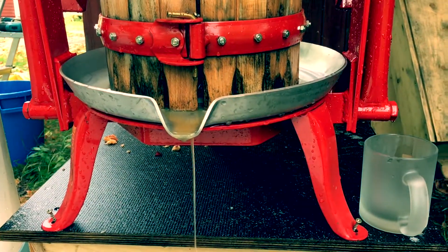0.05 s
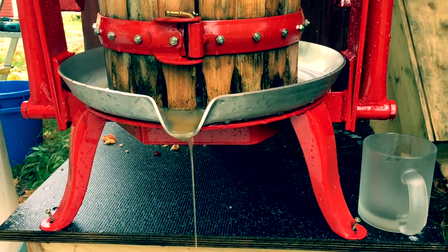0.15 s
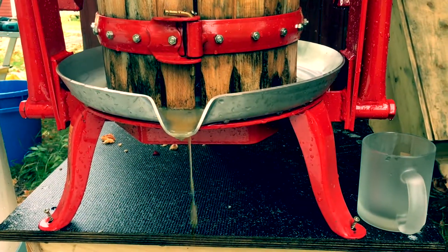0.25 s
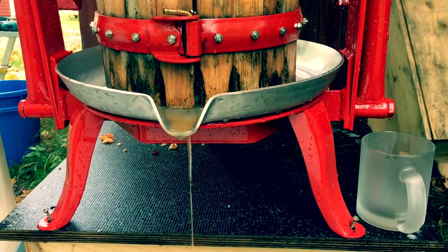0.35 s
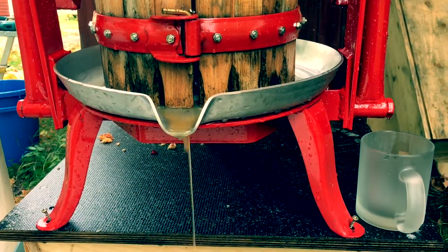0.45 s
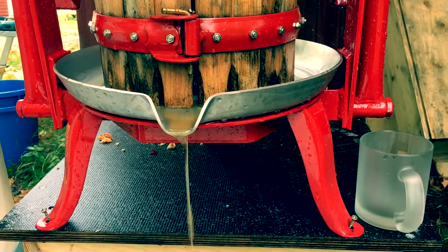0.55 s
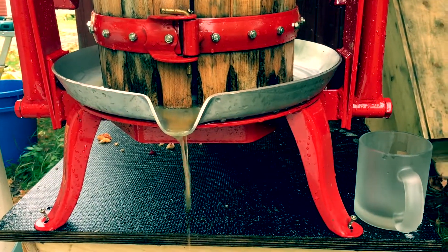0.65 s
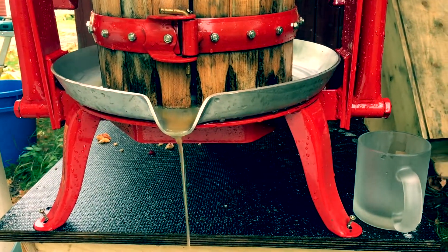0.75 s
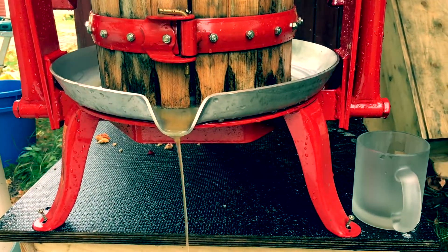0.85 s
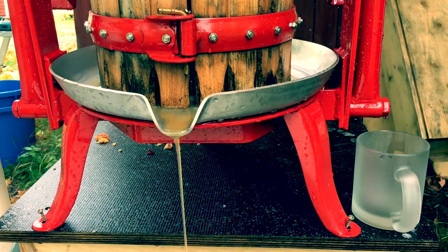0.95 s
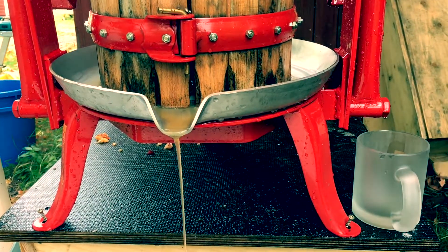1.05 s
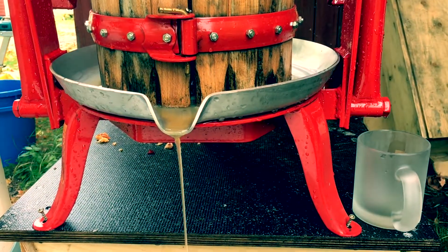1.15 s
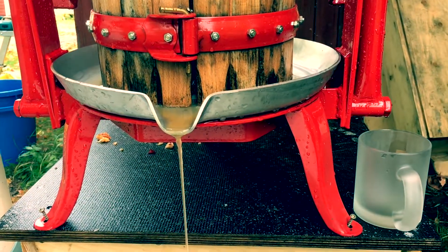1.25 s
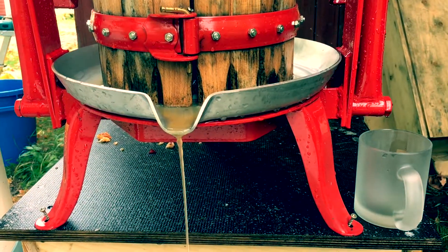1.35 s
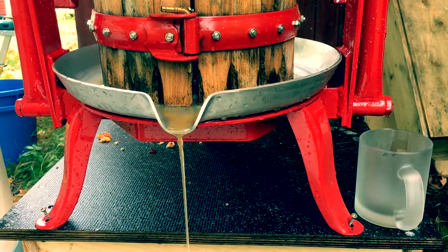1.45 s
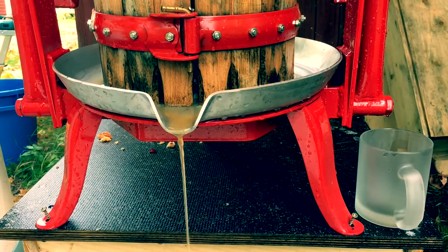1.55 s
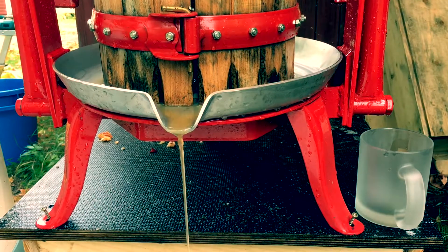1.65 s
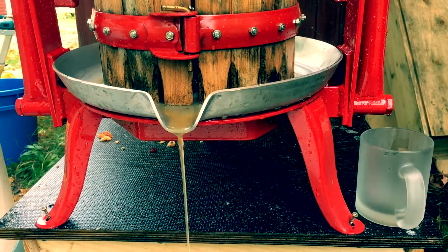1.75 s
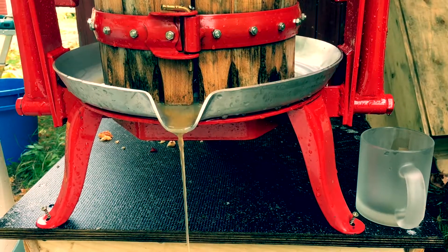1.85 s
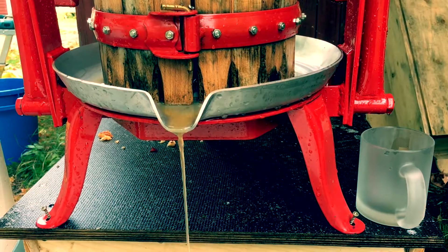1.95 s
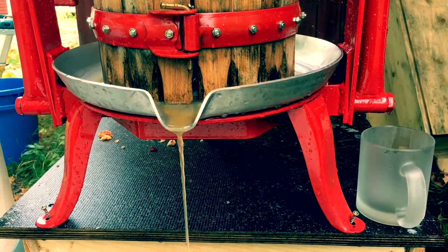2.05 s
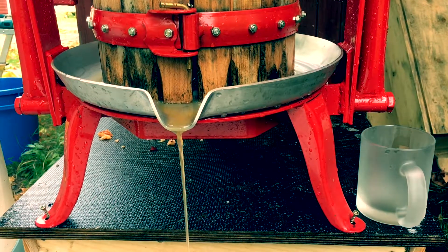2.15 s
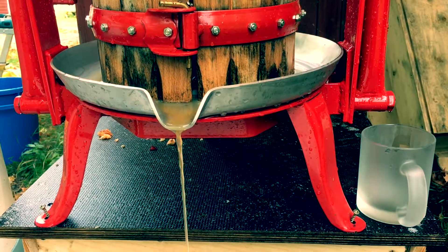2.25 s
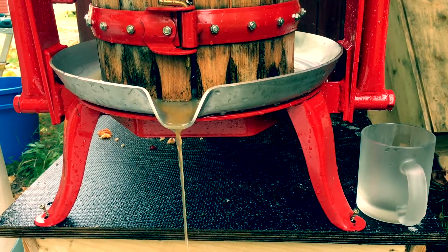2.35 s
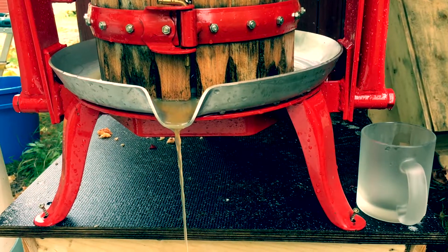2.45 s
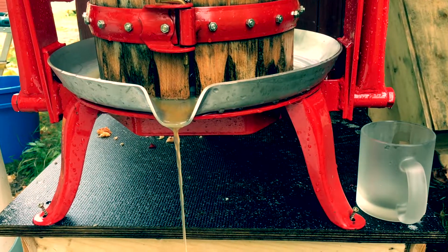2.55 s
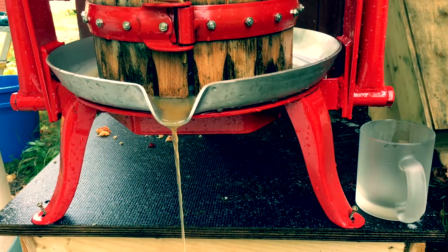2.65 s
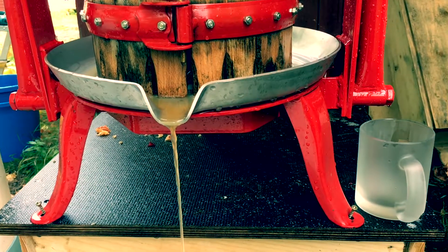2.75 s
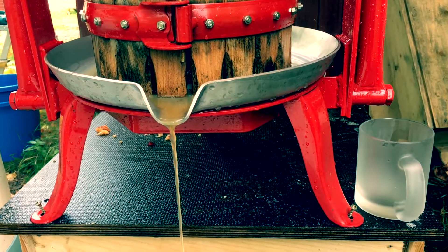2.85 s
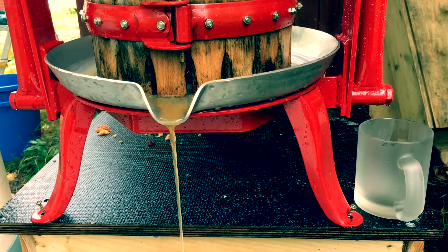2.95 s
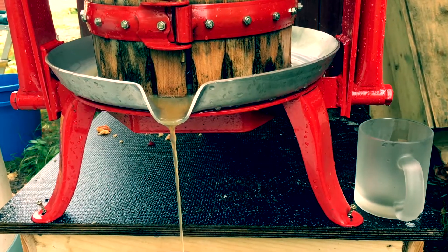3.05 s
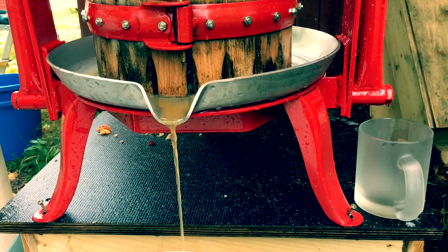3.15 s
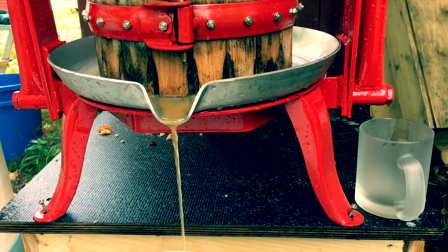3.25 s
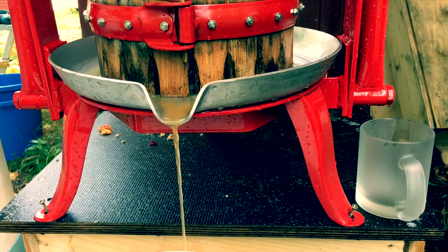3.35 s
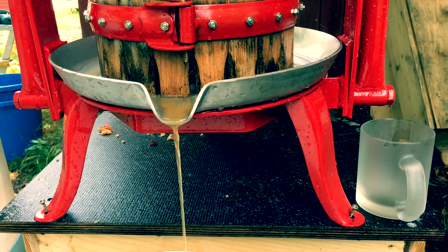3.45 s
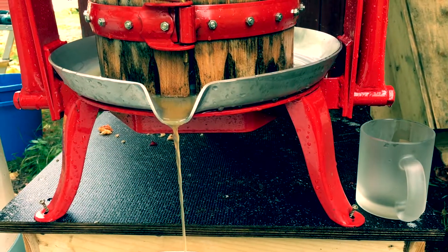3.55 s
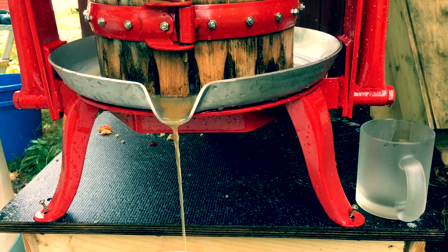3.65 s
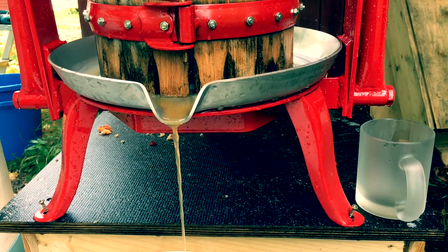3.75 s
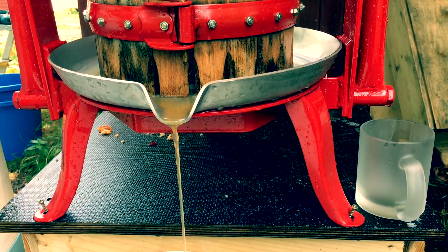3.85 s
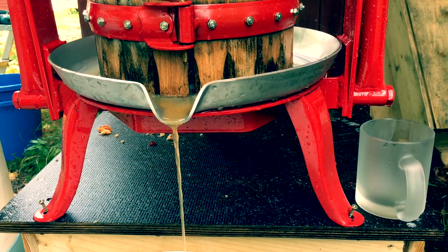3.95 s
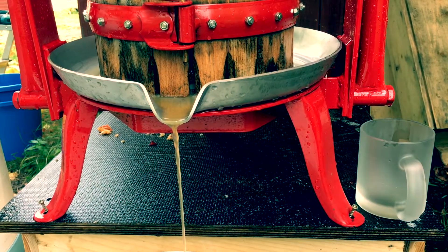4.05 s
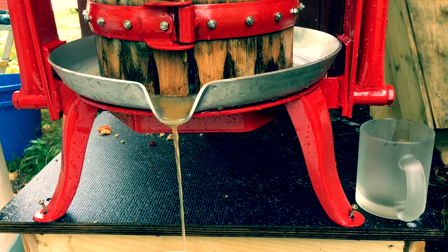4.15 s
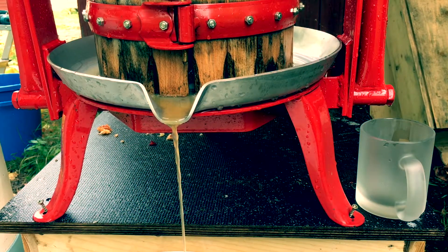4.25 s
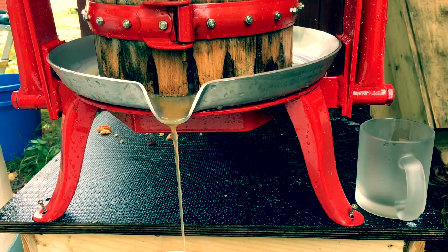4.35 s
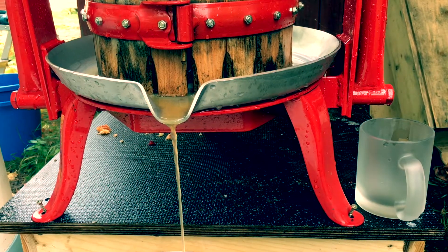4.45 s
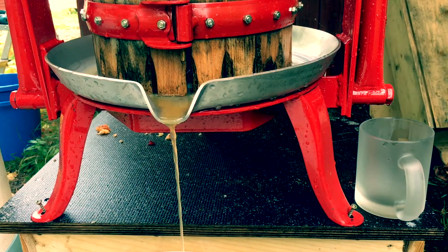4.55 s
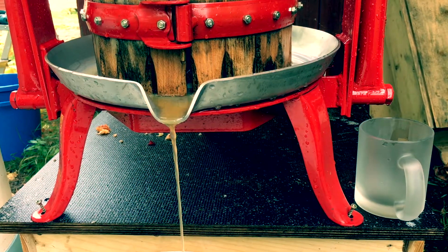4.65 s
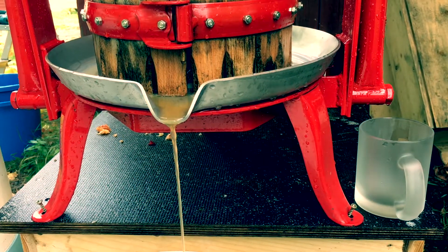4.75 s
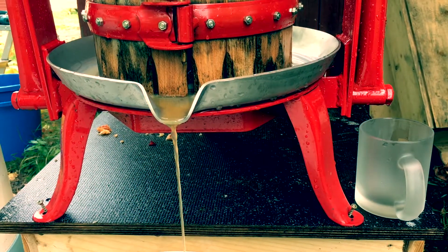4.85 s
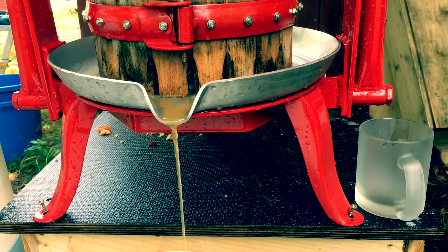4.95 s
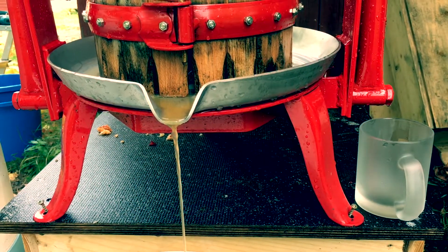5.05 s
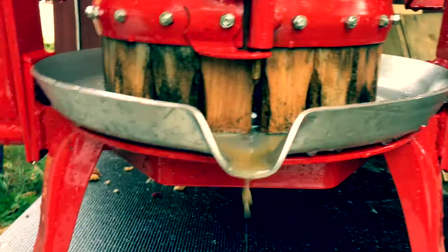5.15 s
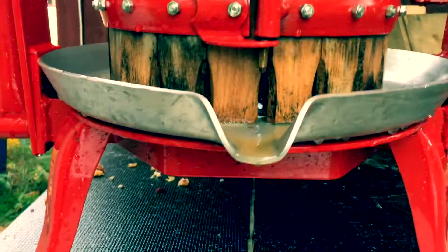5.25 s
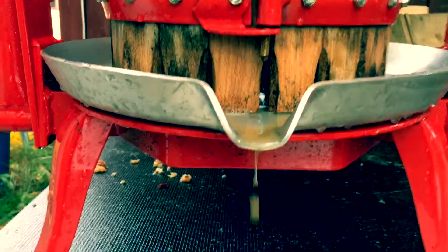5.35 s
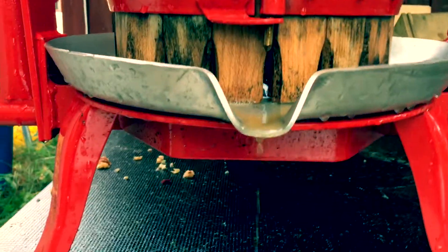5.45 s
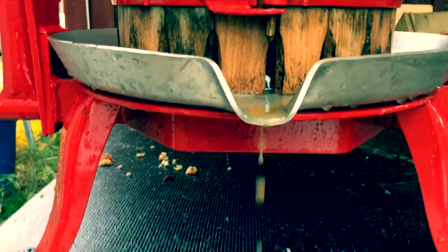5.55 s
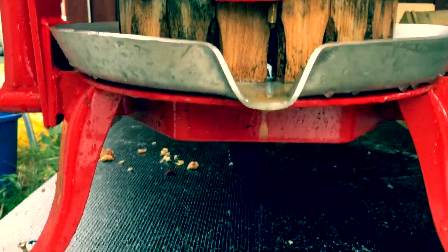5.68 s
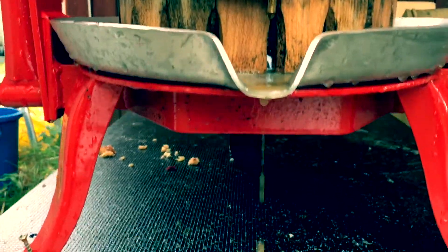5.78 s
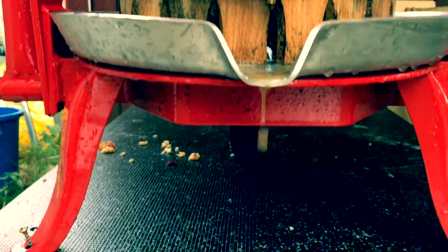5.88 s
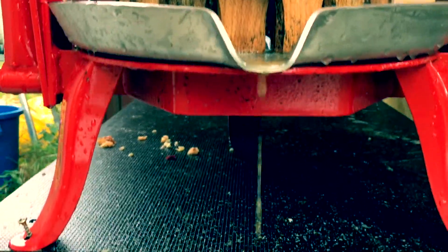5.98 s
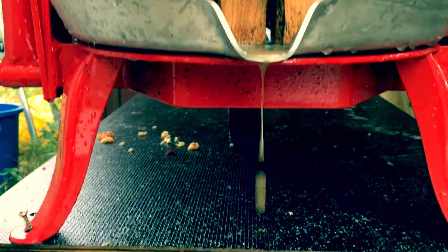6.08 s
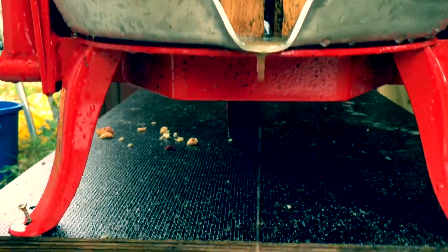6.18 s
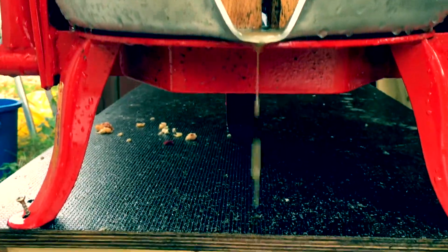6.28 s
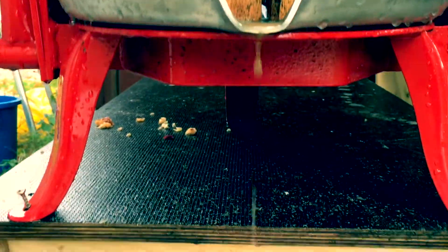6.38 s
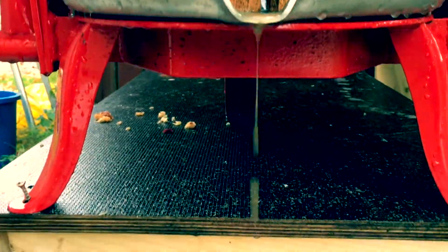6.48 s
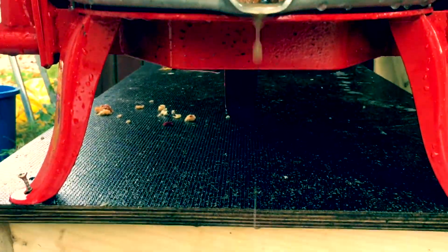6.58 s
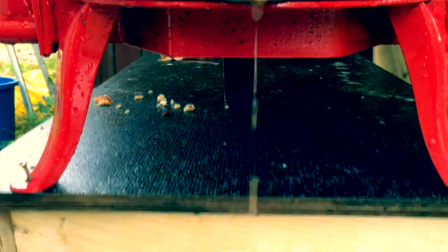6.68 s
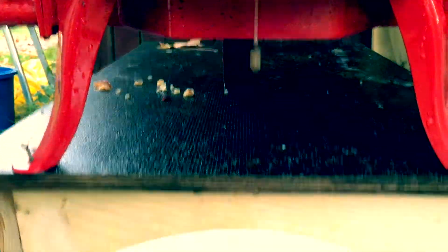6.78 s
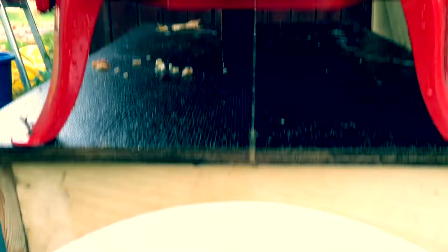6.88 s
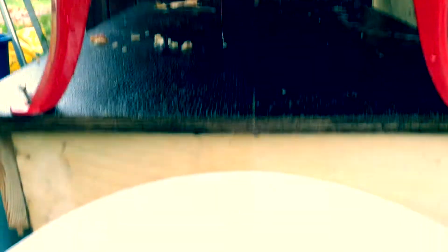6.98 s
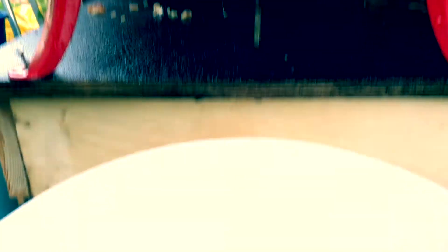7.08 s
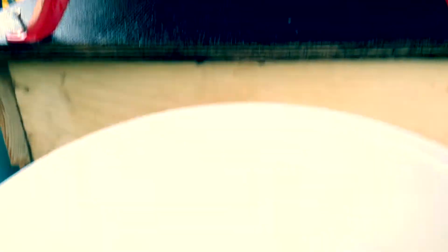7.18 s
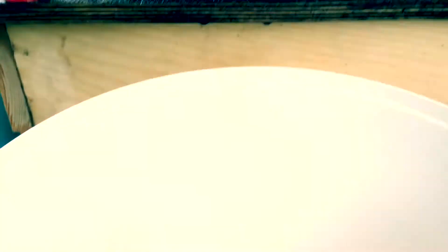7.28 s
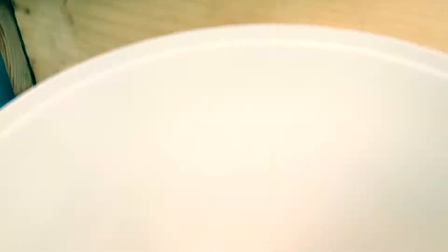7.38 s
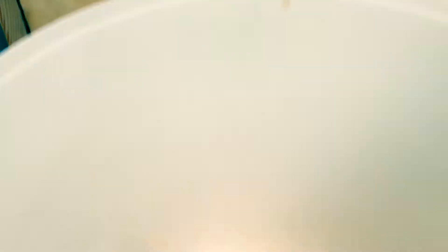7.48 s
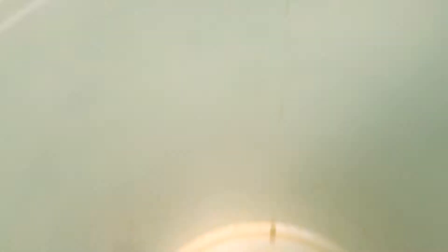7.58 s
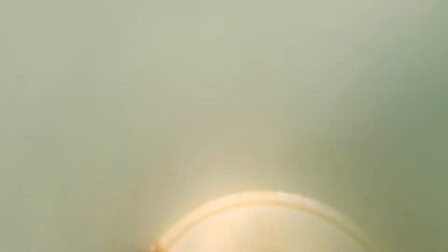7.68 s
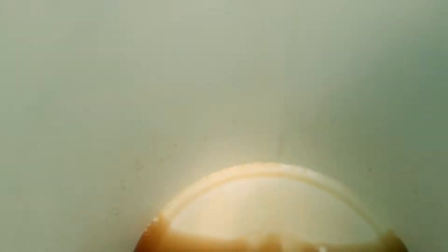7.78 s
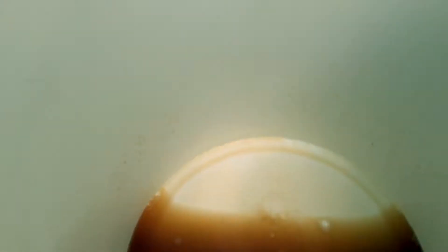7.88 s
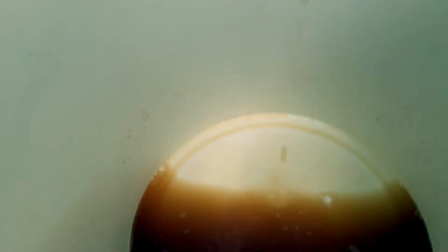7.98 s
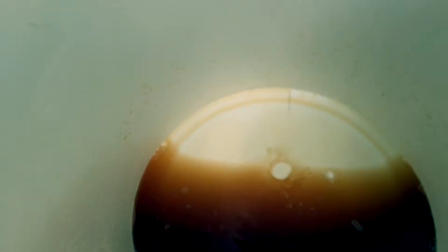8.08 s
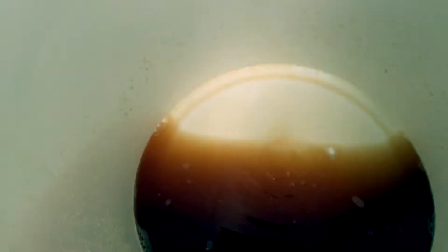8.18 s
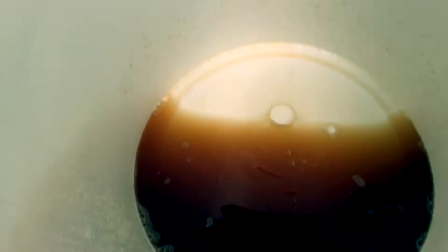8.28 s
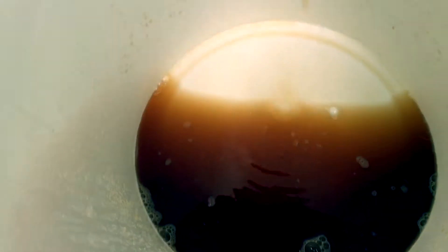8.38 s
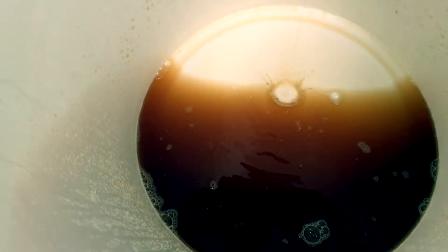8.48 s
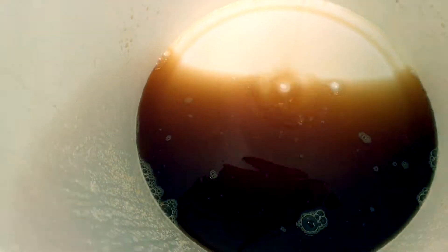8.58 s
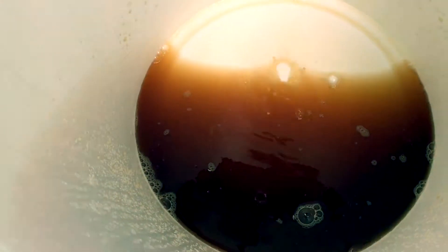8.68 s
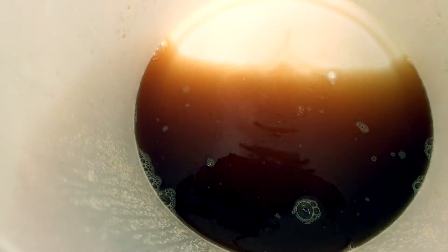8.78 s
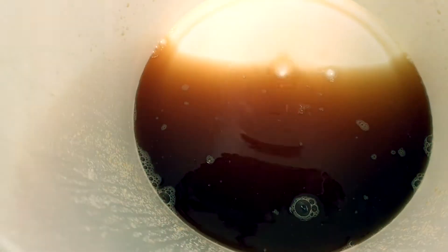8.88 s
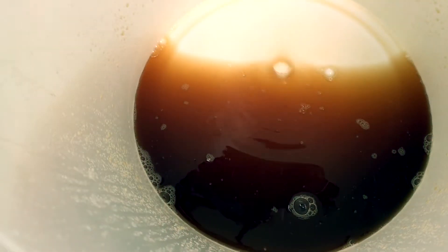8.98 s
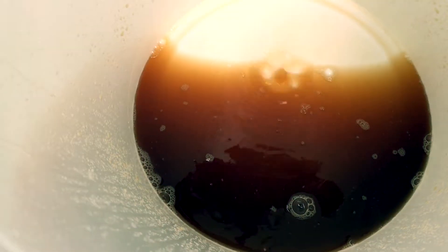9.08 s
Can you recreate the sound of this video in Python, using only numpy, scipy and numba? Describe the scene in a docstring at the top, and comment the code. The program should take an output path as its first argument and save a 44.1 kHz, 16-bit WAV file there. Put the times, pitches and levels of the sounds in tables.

```python
"""Juice runs from a fruit press into a plastic bucket as a thin stream: bubbles gurgle and spatter in a shallow
pool, the jet drums the bottom and the bucket air rings in its standing waves. The stream sound ends abruptly
and the level dips briefly, then single drops strike the bare bottom: decaying modes, down-sweeping slaps and
noisy splat. Smaller droplets, patter, ticks of spray and a few chirping bubbles follow, with scattered echoes.
Filtered noise makes the distant outdoor rumble and hiss beneath."""
import sys
import numpy as np
from scipy import signal
from scipy.fft import rfft, irfft
from scipy.io import wavfile
from scipy.ndimage import uniform_filter1d
from numba import njit

SR = 44100
rng = np.random.default_rng(int(sys.argv[2]) if len(sys.argv) > 2 else 0)


def dump(signal):
    """Clip the signal to [-1, 1] and save it as 16-bit WAV at the path in sys.argv[1]."""
    limited = np.clip(np.atleast_2d(signal).T, -1, 1)
    pcm = np.round(limited * 32767).astype(np.int16)
    wavfile.write(sys.argv[1], SR, pcm)


N = 402191

# strength of the stream, a base level for its bubbles: time_s, level_db
FLOW = [(0, -50), (.45, -53.5), (.65, -58), (.95, -61.5), (1.05, -52), (1.7, -50.5), (2.3, -52.5),
        (2.8, -49.5), (3.25, -48.5), (3.35, -56.5), (3.45, -51), (4.15, -51.5), (4.3, -52), (4.75, -53.5),
        (5.19, -44)]
FLOW_END_S = FLOW[-1][0]
# smaller droplets that follow the drops, once as a long string: start_s, slap_db (relative)
DROPLETS = [(5.260, -30), (5.28, -34), (5.403, -28.5), (5.456, -39), (5.481, -44.5), (5.5, -55),
            (5.536, -43), (5.604, -34), (5.614, -30), (5.769, -29), (5.818, -41), (5.833, -41),
            (5.964, -25.5), (6.167, -41.5), (6.183, -41.5), (6.321, -27.5), (6.458, -26), (6.516, -37),
            (6.835, -28), (7.039, -28), (7.069, -31), (7.189, -25), (7.227, -38), (7.235, -39),
            (7.262, -39), (7.296, -42), (7.403, -23), (7.435, -31.5), (7.608, -34), (7.637, -39),
            (7.656, -40.5), (7.792, -23), (7.819, -35.5), (7.993, -36), (8.175, -26), (8.213, -34),
            (8.221, -37), (8.234, -26.5), (8.423, -38), (8.436, -31.5), (8.463, -38.5), (8.595, -24.5),
            (8.61, -43), (8.624, -33), (8.638, -35.5), (8.659, -30), (8.668, -30.5), (8.693, -32.5),
            (8.708, -36), (8.721, -30), (8.752, -28), (8.765, -32), (8.783, -31), (8.960, -35),
            (8.972, -44), (8.986, -37.5)]


def undb(db):
    """Amplitude ratio of a level in decibels."""
    return 10 ** (np.asarray(db) / 20)


def unit(x):
    """Normalisation to unit root-mean-square."""
    return x / np.sqrt(np.mean(x ** 2))


@njit
def grains(at, hz, cycles, octaves, rise, size, length):
    """Damped oscillators: sines that rise in `rise` cycles, last `cycles` to -60 dB and glide by `octaves`."""
    out = np.zeros(length)
    for k in range(len(at)):
        span = cycles[k] / hz[k] * SR
        fall = np.exp(-np.log(1000) / span)
        bend = 2 ** (octaves[k] / span)
        grow = np.exp(-hz[k] / SR / rise[k])
        gain, lack, step, phase = size[k], 1., hz[k] / SR, 0.
        for i in range(min(int(span), length - at[k])):
            phase += 2 * np.pi * min(step, .45)
            step, gain, lack = step * bend, gain * fall, lack * grow
            out[at[k] + i] += gain * (1 - lack) * np.sin(phase)
    return out


def play(s, hz, cycles, octaves, db, rise=0.015):
    """Superposition of damped oscillators, from columns that broadcast to one shape."""
    columns = np.broadcast_arrays(s, hz, cycles, octaves, rise, db)
    s, hz, cycles, octaves, rise, db = (np.ravel(c) * 1. for c in columns)
    at = np.clip(s * SR, 0, N - 1).astype(np.int64)
    return grains(at, hz, cycles, octaves, rise, undb(db), N)


def resonate(x, hz, width_hz):
    """Resonance: a single mode whose bandwidth sets its damping."""
    return signal.lfilter(*signal.iirpeak(hz, hz / width_hz, SR), x)


def band(x, lo_hz, hi_hz):
    """Band-pass filtering between two corner frequencies."""
    return signal.sosfilt(signal.butter(N=2, Wn=[lo_hz, hi_hz], btype="band", fs=SR, output="sos"), x)


def tail(x, t60, lo_hz, hi_hz):
    """Dense scattering: convolution with a fading noise response of unit energy and even colour."""
    t = np.arange(SR // 4) / SR
    spectrum = rfft(rng.standard_normal(len(t)) * 1000. ** (-t / t60))
    spectrum = spectrum / np.sqrt(uniform_filter1d(np.abs(spectrum) ** 2, size=60))
    response = band(irfft(spectrum)[:SR // 5], lo_hz, hi_hz)
    response = response / np.sqrt(np.sum(response ** 2))
    return signal.fftconvolve(x, response)[:N]


def wander(hold_s):
    """Slow random modulation: normal deviates joined by straight lines."""
    return np.interp(np.arange(N) / SR / hold_s, np.arange(200), rng.standard_normal(200))


def flow(s):
    """Source strength of the stream in dB at times s; practically silent once it has stopped."""
    at, db = np.transpose(FLOW)
    return np.interp(s, at, db, right=-120.)


def gurgles():
    """Bubble resonance: each large trapped bubble rings and glides upward as it rises."""
    # the largest bubbles caught under the stream: start_s, level_db (relative), pitch_hz
    large_bubbles = [(0.041, -17.5, 1510), (0.24, -14.5, 2200), (0.083, -24.5, 1060), (0.437, -18, 2840),
                     (0.511, -18, 1220), (0.559, -29.5, 1760), (0.799, -21.5, 865), (0.973, -25, 1930),
                     (1.055, -34, 1100), (1.084, -19.5, 2400), (1.085, -43, 1420), (1.107, -24.5, 1080),
                     (1.126, -38, 1760), (1.17, -24, 2260), (1.249, -25, 2150), (1.355, -21, 2520),
                     (1.392, -21, 1700), (1.561, -26, 1130), (1.92, -23.5, 910), (2.218, -21, 2030),
                     (2.275, -25, 900), (2.291, -22.5, 1910), (2.559, -27, 1000), (2.983, -25, 1980),
                     (3.014, -31.5, 1000), (3.109, -25, 780), (3.19, -23, 2010), (3.395, -21, 800),
                     (3.602, -29.5, 800), (3.771, -24, 2200), (3.822, -24, 940), (3.936, -21, 1140),
                     (4.02, -24.5, 816), (4.05, -18, 2650), (4.672, -22.5, 810), (4.784, -21, 830),
                     (4.886, -17.5, 1590), (1.285, -20, 1240), (1.376, -20.5, 1000), (1.443, -21, 825),
                     (1.783, -18.5, 930), (1.8, -16, 2190), (1.836, -12.5, 1900), (1.956, -20, 1700),
                     (2.008, -14.5, 3100), (2.199, -24.5, 917), (2.246, -13, 925), (2.32, -23.5, 780),
                     (2.3846, -11, 833), (2.461, -16.5, 1630), (2.58, -14.5, 2080), (2.636, -19, 1500),
                     (2.812, -15.5, 2150), (3.343, -19, 750), (3.369, -9.5, 1893), (3.448, -11.5, 1420),
                     (3.685, -21, 1070), (3.857, -19, 780), (4.116, -20.5, 800), (4.315, -18, 890),
                     (4.349, -11, 2160), (4.429, -15, 760), (4.471, -15.5, 2700), (4.892, -18.5, 880),
                     (5.061, -14, 1950), (5.132, -13, 920)]
    s, db, hz = np.transpose(large_bubbles)
    ring = play(s, hz, 8.6, 0.13, db - 11.5, rise=0.14)
    late_ring = play(s + 0.00243, 1.078 * hz, 10.0, 0.19, db - 14.0, rise=0.65)
    # the bead that traps the bubble also knocks, short and broad
    knock = play(s, 1.85 * hz, 4.9, -0.66, db - 10.0, rise=0.21)
    low_knock = play(s, 460.0, 2.0, 0., db - 17.0, rise=0.22)
    return ring + late_ring + knock + low_knock


def scattered(rows, count, lo_hz, hi_hz, db, scatter_db):
    """Random superposition: listed bubbles plus `count` others, louder where the stream is strong."""
    u = rng.random((count, 3)).T
    s = u[0] * FLOW_END_S
    others = [s, flow(s) + db - scatter_db * u[1], lo_hz * (hi_hz / lo_hz) ** u[2]]
    return np.hstack([np.transpose(rows), others])


def splashes():
    """Size sets pitch in bubble resonance: small surface bubbles ring high, with neighbours in size."""
    # the loudest small bubbles and splashes at the surface: start_s, level_db (relative), pitch_hz
    surface_bubbles = [(0.3242, -19.5, 6600), (0.512, -21, 6050), (0.5598, -17.5, 9300),
                       (0.797, -19, 12300), (1.0032, -15.5, 8500), (1.025, -16, 5650), (1.0964, -16, 12100),
                       (1.1716, -16.5, 9450), (1.2489, -12.5, 8300), (0.6724, -26, 3750),
                       (0.8345, -22, 6300), (1.3094, -23, 5650), (1.3683, -19.5, 8800), (1.8763, -22, 6800),
                       (2.0297, -15, 9450), (2.1146, -19, 7600), (2.2204, -17, 8640), (2.3191, -15, 9650),
                       (2.453, -26.5, 5300), (2.7331, -14, 7370), (2.7646, -16, 12200), (2.826, -18, 5520),
                       (2.9402, -19.5, 5930), (3.0087, -19, 4130), (3.0959, -18.5, 9000),
                       (3.1757, -17.5, 10100), (3.189, -15, 5600), (3.3723, -20.5, 4170),
                       (3.4268, -17, 7700), (3.5024, -21, 6950), (3.6262, -21.5, 6950),
                       (3.6866, -18.5, 10800), (3.7706, -20, 4440), (4.0238, -23, 3820),
                       (4.0515, -21, 6160), (4.258, -18, 8900), (4.5394, -17.5, 9480), (4.593, -26, 5300),
                       (4.6422, -16, 6130), (4.681, -18.5, 6500), (5.033, -12, 7600), (5.0973, -30, 9200),
                       (0.2603, -23, 12600), (0.4883, -21, 12800), (0.6794, -16, 12800),
                       (1.054, -25, 15100), (1.8766, -17, 14300), (2.6668, -19, 15000),
                       (3.6257, -26, 14800), (3.7903, -10.5, 15600), (4.0517, -25, 14400),
                       (4.3784, -17, 14700), (4.4533, -23, 14900), (4.8294, -27, 15100), (2.799, -30, 7000),
                       (2.884, -23, 6700), (2.985, -23.5, 3670), (3.859, -26.5, 3700), (3.645, -31, 3720),
                       (5.1332, -29, 6600)]
    s, db, hz = scattered(surface_bubbles, count=48, lo_hz=3730.0, hi_hz=11000.0, db=35.0, scatter_db=28.0)
    ring = play(s, hz, 44.5, 0.023, db - 10.0, rise=0.97)
    near = np.exp(0.3 * rng.standard_normal((len(s), 14)))  # 14 pitch ratios for each splash
    near_s = s[:, None] + 0.015 * rng.random(near.shape) ** 1.4
    near_hz = np.minimum(hz[:, None] * near, .4 * SR)
    return ring + play(near_s, near_hz, 9.7, 0.99, db[:, None] - 10, rise=0.59)


def swarm(count, size, lo_hz, hi_hz, spread_s, cycles, octaves, scatter_db, db, tilt_db):
    """Clustered bubble resonance: clumps of like size where a bead of the jet lands; tilt_db per octave."""
    u = rng.random((count, 2)).T[..., None]
    v = rng.standard_normal((count, size, 3))
    s = u[0] * FLOW_END_S + spread_s * np.abs(v[..., 0])
    hz = np.minimum(lo_hz * (hi_hz / lo_hz) ** u[1] * np.exp(.12 * v[..., 1]), .4 * SR)
    clump_db = scatter_db * np.clip(v[:, :1, 2], -2, 1.6)
    level_db = flow(s) + db + clump_db + tilt_db * np.log2(hz / lo_hz) + 2.15 * v[..., 2]
    return play(s, hz, cycles, octaves, level_db, rise=0.73)


def bucket_air(water, thick):
    """Standing waves: resonances of the enclosed air, rebalanced as the jet thickens (thick, 0 to 1)."""
    # air modes, gains relative: pitch_hz, width_hz, thin_jet_db, thick_jet_db
    air_modes = [(559, 22, 0, 3), (647, 36, -0.5, 2), (817, 33, -1.5, 3), (986, 115, -6, 1),
                 (1084, 63, 5, -6), (1456, 34, 4.5, 0), (1690, 39, 7.5, 3.5), (1793, 60, 4, 1),
                 (1963, 13.3, -2, 12), (2231, 18.5, 11, 11), (2550, 23, 3, 4.5), (2644, 33, 3.5, -11.5),
                 (3056, 76, 4.5, -2), (3500, 61, -3, -2.5), (3680, 68, -9, 0.5), (4170, 86, 0, -8),
                 (5330, 105, -13, 0.5), (5610, 160, -1.5, -9), (6350, 51, -8, 2), (6840, 61, -4, -5),
                 (7670, 1770, -9, -5)]
    air = np.zeros(N)
    for hz, width_hz, thin_db, thick_db in air_modes:
        # the jet roams, so each standing wave swells and sinks: 3 dB deviations, 0.1 s apart
        gain_db = thin_db + thick * (thick_db - thin_db) + 3 * wander(.1)
        air += undb(gain_db) * resonate(water, hz, width_hz)
    return air


def drumming(thick):
    """Forced vibration: random kicks of the jet excite the bottom under the pool, harder when it is thick."""
    # modes of the bottom under the pool, gains relative: pitch_hz, width_hz, level_db
    drum_modes = [(59.4, 14, -33), (90.5, 10.7, -0.5), (161.1, 13.4, 8), (330, 17.4, -7.5), (516, 65, -15),
                  (806, 26, -10), (1000, 69, -29)]
    thin_db, thick_db = -57, -45.5
    kicks = rng.standard_normal(N) * (rng.random(N) < 260 / SR)  # 260 a second on average
    drum = unit(sum(undb(db) * resonate(kicks, hz, width_hz) for hz, width_hz, db in drum_modes))
    return drum * undb(thin_db + thick * (thick_db - thin_db))


def stream():
    """Source and resonator: bubble sounds pass through the bucket air and walls; the jet drums below."""
    water = gurgles() + splashes()
    water = water + swarm(count=1150, size=3, lo_hz=660.0, hi_hz=3400.0, spread_s=.0085, cycles=10.2,
                          octaves=0.41, scatter_db=4.5, db=4.0, tilt_db=0.74)
    water = water + swarm(count=1200, size=9, lo_hz=2860.0, hi_hz=10940.0, spread_s=.009, cycles=10.7,
                          octaves=0.11, scatter_db=8.0, db=-0.5, tilt_db=3.0)
    water = water + swarm(count=800, size=6, lo_hz=9400.0, hi_hz=17100.0, spread_s=0.006, cycles=7.7,
                          octaves=0.085, scatter_db=11.0, db=5.0, tilt_db=-3.0)
    thickens_s, thickening_s = 1.68, 0.15  # moment and length of the change
    thick = np.clip((np.arange(N) / SR - thickens_s) / thickening_s, 0, 1)
    walls = undb(1.0) * tail(water, 0.047, 624.0, 22000.0)
    return undb(-18.5) * water + undb(7.5) * bucket_air(water, thick) + walls + drumming(thick)


def outdoors():
    """Spectral shaping of random noise: distant rumble and a faint hiss."""
    # noise spectrum, levels relative: pitch_hz, level_db (density per Hz)
    outdoor_spectrum = [(25, -15), (60, 4), (100, 1), (200, -6.5), (400, -25), (800, -21.5), (1600, -28.5),
                        (9000, -36), (10800, -39.5), (16000, -41.5)]
    hz = np.fft.rfftfreq(N, 1 / SR)
    f, db = np.transpose(outdoor_spectrum)
    colour = undb(np.interp(np.log(hz + 1), np.log(f), db, left=-60.))
    noise = irfft(rfft(rng.standard_normal(N)) * colour, N)
    return undb(-49) * unit(noise)


def blows():
    """Impact strengths: time (s), relative slap dB and thud dB of every drop and droplet."""
    # drops on the bare bottom, levels relative: start_s, slap_db, thud_db
    large_drops = [(5.210, -44, -25.5), (5.361, -23.5, -17), (5.5626, -24, -20), (5.7193, -26, -20.5),
                   (5.883, -35, -28.5), (5.9219, -29, -21), (6.0957, -24.5, -19), (6.267, -29.5, -19),
                   (6.4166, -24.5, -17), (6.612, -33, -27.5), (6.627, -21.5, -23.5), (6.679, -30.5, -25),
                   (6.793, -25, -18), (6.987, -27, -18.5), (7.1483, -19.5, -17), (7.346, -32.5, -28),
                   (7.3548, -19.5, -20), (7.5574, -20.5, -16.5), (7.741, -19, -21), (7.943, -22.5, -15.5),
                   (8.123, -22.5, -16), (8.1827, -17.5, -16.5), (8.37, -20.5, -16), (8.544, -21.5, -15.5),
                   (8.736, -20.5, -16.5), (8.9031, -22, -16.5), (9.0848, -24, -16.5)]
    s, slap_db = np.transpose(DROPLETS)
    thud_db = slap_db - 0.5
    return np.hstack([np.transpose(large_drops), [s, slap_db, thud_db]])


def strike(s, db, modes, rise, detune, scatter_db):
    """Modal excitation: every blow lands elsewhere, so it wakes the modes a little differently."""
    hz, mode_db, t60 = np.transpose(modes)
    chance = rng.standard_normal((len(s), len(hz), 2))
    blow_hz = hz * (1 + detune * chance[..., 0])
    blow_db = db[:, None] + mode_db + scatter_db * chance[..., 1]
    return play(s[:, None], blow_hz, hz * t60, 0., blow_db, rise=rise)


def patter(s, slap_db):
    """Secondary impacts: five satellites trail each droplet as small knocks that tick."""
    u = rng.random((len(s), 5, 3))
    at = s[:, None] + 0.0071 + 0.028 * u[..., 0]
    # droplets that slap louder than -23.5 dB shed no louder patter
    db = np.minimum(slap_db, -23.5)[:, None] - 5.5 - 9 * u[..., 2]
    knocks = play(at, 660.0 * 2.4 ** u[..., 1], 3.7, -0.99, db, rise=0.38)
    return knocks + play(at, 5300.0 * 2.25 ** u[..., 1], 9.0, 0., db - 7.0, rise=0.6)


def drops(s, slap_db, thud_db):
    """Dispersion: bending waves arrive treble first, so the slap sweeps down; the bottom swings up last."""
    # modes of the dry bottom, low then high, levels relative: pitch_hz, level_db, t60_s
    thud_modes = [(81, -11, 0.21), (139.8, -13, 0.27), (153, -11, 0.16), (185.6, 0.5, 0.12),
                  (204.5, 3, 0.1), (239.5, -3.5, 0.065), (268, -18, 0.051), (285.3, -20.5, 0.092),
                  (345, -14.5, 0.06), (394, -25.5, 0.04)]
    slap_modes = [(573, -1, 0.08), (652, 6.5, 0.045), (804, 10.5, 0.047), (1003, 9, 0.022),
                  (1267, 11, 0.017), (1393, 5.5, 0.017), (1694, -1, 0.017)]
    thud = band(strike(s, thud_db + .5, thud_modes, rise=1.4, detune=.007, scatter_db=2.5), 72.5, 360.0)
    spot = np.exp(.1 * rng.standard_normal(len(s)))  # where the drop lands sets the sweep
    sweep = play(s, 2170.0 * spot, 12.0, -1.5, slap_db - 9.5)
    sweep = sweep + play(s + 0.00418, 1226.0 * spot, 15.5, -1.63, slap_db - 7.0, rise=1.0)
    click = play(s, 3520.0, 3.16, 0., slap_db + 0.5, rise=0.167)
    click = click + play(s + 0.00121, 3500.0 * spot, 14.0, 0., slap_db - 15.0, rise=.6)
    ring = strike(s, slap_db - 21.0, slap_modes, rise=0.2, detune=0.029, scatter_db=3.5)
    slap = band(ring + sweep + click, 593.0, 14150.0)
    impacts = slap + patter(*np.transpose(DROPLETS))
    # the film of juice tears differently each time: fresh noise that follows the blows and fades
    fading = signal.lfilter([1 / (0.0047 * SR)], [1, -np.exp(-1 / (0.0011 * SR))], np.abs(impacts))
    splat = undb(16.5) * fading * band(rng.standard_normal(N), 344.0, 1900.0)
    return thud + impacts + splat + undb(-14.5) * tail(impacts, 0.064, 180.0, 4100.0)


def ticks(blow_s, slap_db):
    """Reflection: each tiny pop clicks, rings briefly and returns as an echo off the wall."""
    # spray popping loudly: start_s, level_db (relative), pitch_hz
    loud_pops = [(5.5618, 0.5, 8100), (5.54, -46, 7500), (5.622, -40, 13500), (5.764, -29.5, 9200),
                 (5.833, -41, 7500), (5.982, -46, 9500), (8.669, -31, 6300), (8.678, -34, 7500),
                 (5.9229, -26, 15200), (5.964, -27, 12700), (6.2666, -37, 10870), (6.416, -18.5, 13900),
                 (6.6288, -11.5, 10100), (6.629, -15, 4540), (6.8368, -27.5, 11500), (7.3552, -11.5, 14300),
                 (7.3556, -24.5, 5800), (7.3558, -29, 7700), (7.408, -39, 15000), (7.068, -49, 12100),
                 (7.1485, -29, 13000), (6.987, -35.5, 14500), (7.7381, -20, 14400), (7.993, -28, 14000),
                 (8.1806, -27, 5800), (8.215, -40, 9100), (8.244, -60, 8000), (8.436, -25.5, 5650),
                 (8.465, -30, 12400), (8.5428, -20, 13000), (8.6413, -29, 12300), (8.658, -17, 6340),
                 (8.708, -25, 15400), (8.7353, -12, 12800), (8.9595, -28.5, 7500)]
    s, db, hz = np.transpose(loud_pops)
    # every blow also ticks faintly, in proportion to its slap
    faint_hz = 5760 * np.exp(0.16 * rng.standard_normal(len(blow_s)))
    s, db, hz = np.hstack([[s, db, hz], [blow_s, slap_db - 12.5, faint_hz]])
    ring = play(s, hz, 15.5, 0.0504, db + 3.5, rise=0.43)
    click = play(s, 1.08 * hz, 4.7, 0., db - 2.5, rise=0.117)
    echo = play(s + 0.0021, hz, 11.0, 0.0673, db + 0.5, rise=0.46)
    return band(ring + click + echo, 4300.0, 16200.0)


def plips():
    """Rising bubble resonance: bubbles in the puddle chirp upward."""
    # chirping bubbles: start_s, level_db (relative), starting pitch_hz, glide_octaves
    chirps = [(8.003, -38, 3270, 1.5), (8.025, -36, 3270, 1.9), (8.039, -49, 4200, 1.3),
              (8.058, -60, 6200, .2), (8.243, -46, 3800, .15), (8.635, -41.5, 2800, 1.27),
              (8.66, -38, 2110, 1.35), (9.105, -55, 2670, 1.27)]
    s, db, hz, glide = np.transpose(chirps)
    chirp = play(s, hz, 25.7, glide, db + 12, rise=3.2)
    return chirp + play(s + 0.0032, 1.48 * hz, 30.0, 0.15, db + 3.0, rise=3.4)


def spray(blow_s, slap_db):
    """Diffuse reflection: ticks and chirps followed by a brief scatter."""
    pops = ticks(blow_s, slap_db) + plips()
    return pops + undb(-7.5) * tail(pops, 0.03, 3900.0, 19500.0)


def scene():
    """Linear superposition of all sources; a short silence parts the stream from the drops."""
    t = np.arange(N) / SR
    stream_end_s, gap_s = 5.198, 0.0049
    fade = np.clip((stream_end_s - t) / 0.02, 0, 1)
    # the outdoors is silent through the gap, with a 2.9 ms ramp on either side
    gap = np.clip((np.abs(t - stream_end_s - gap_s / 2) - gap_s / 2) / 0.0029, 0, 1)
    s, slap_db, thud_db = blows()
    mix = stream() * fade + outdoors() * gap + drops(s, slap_db, thud_db) + spray(s, slap_db)
    return mix[None]


def record(dry):
    """Saturation and band limiting: loud peaks are rounded and the treble above 16.3 kHz is cut steeply."""
    rounded = 1.5 * np.tanh(dry / 1.5)
    return .98 * signal.sosfilt(signal.ellip(10, .2, 70, 16300, fs=SR, output="sos"), rounded)


dry = scene()
out = record(dry)
dump(out)
```